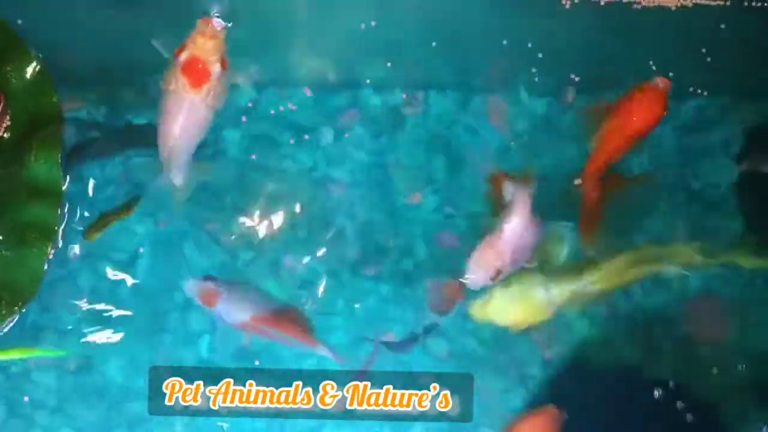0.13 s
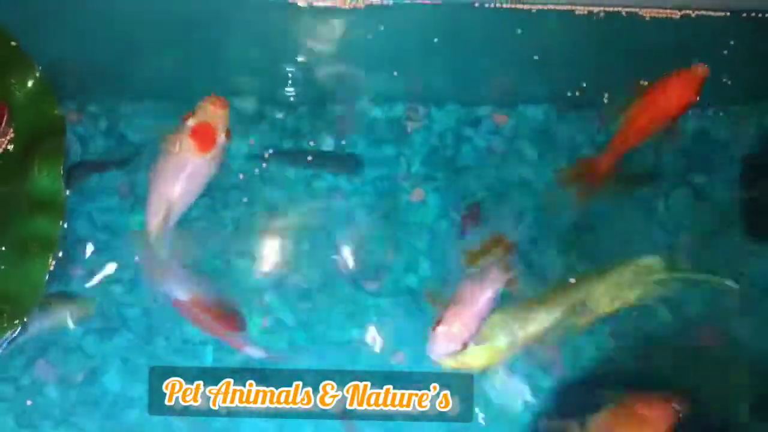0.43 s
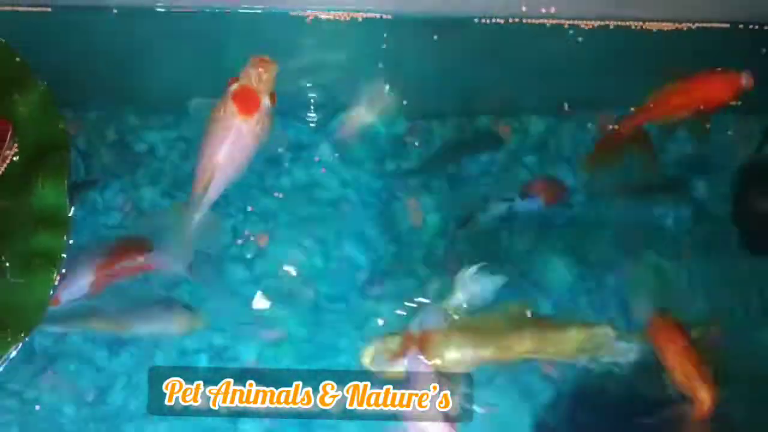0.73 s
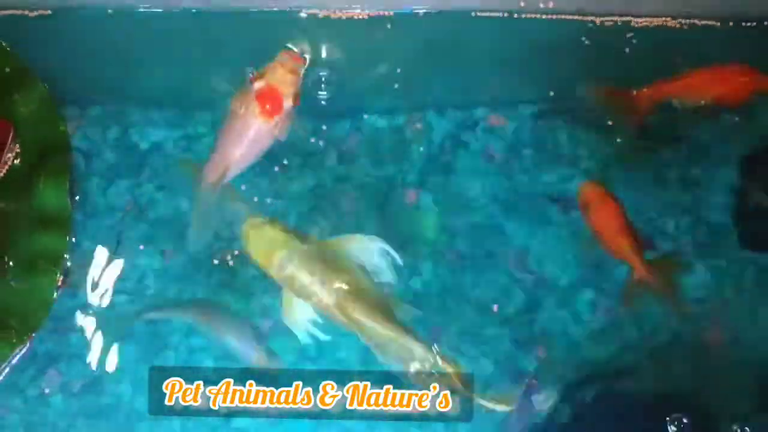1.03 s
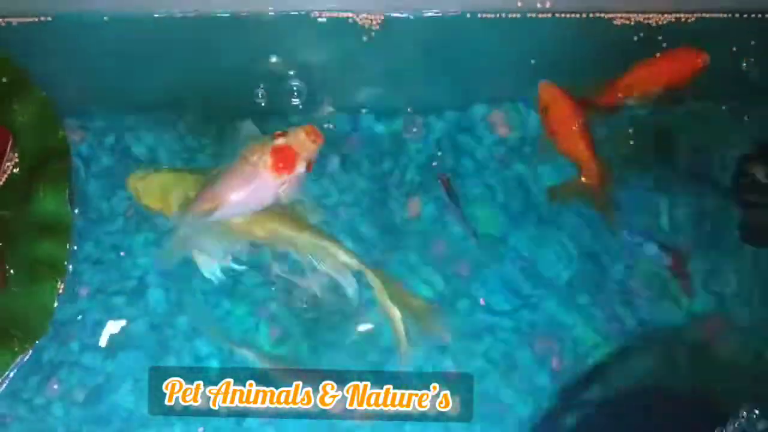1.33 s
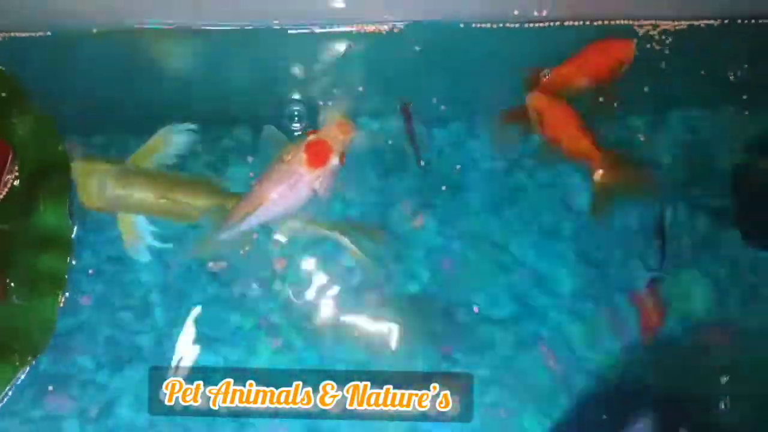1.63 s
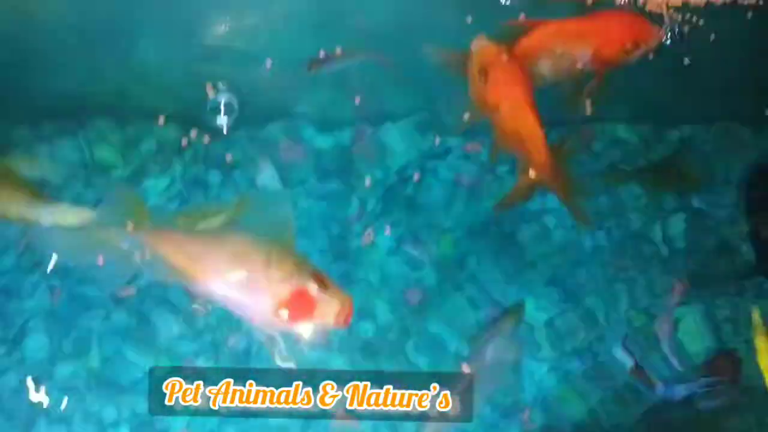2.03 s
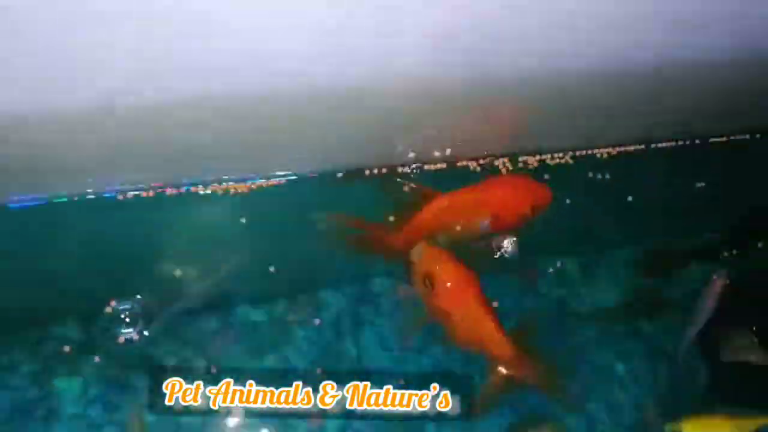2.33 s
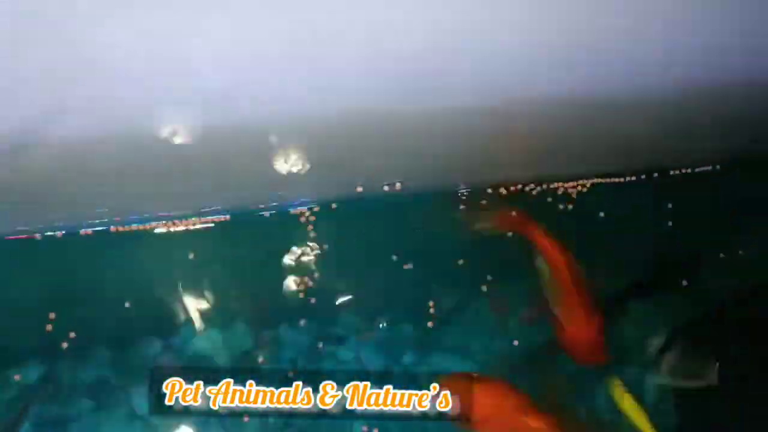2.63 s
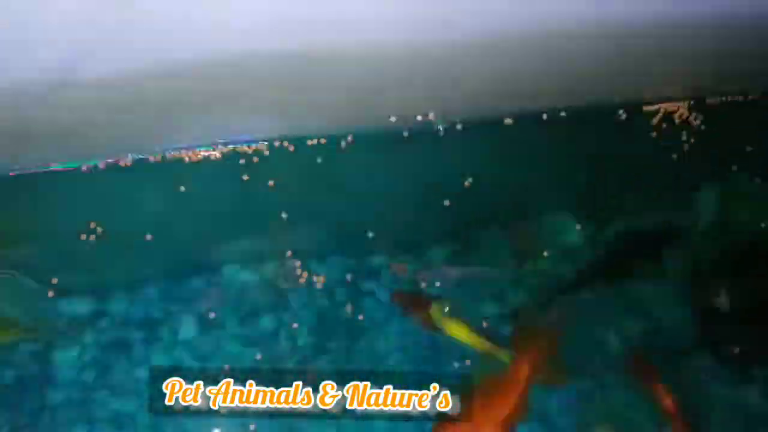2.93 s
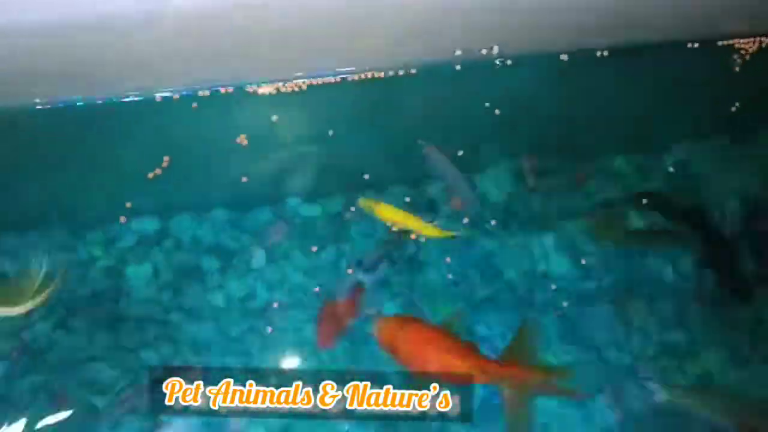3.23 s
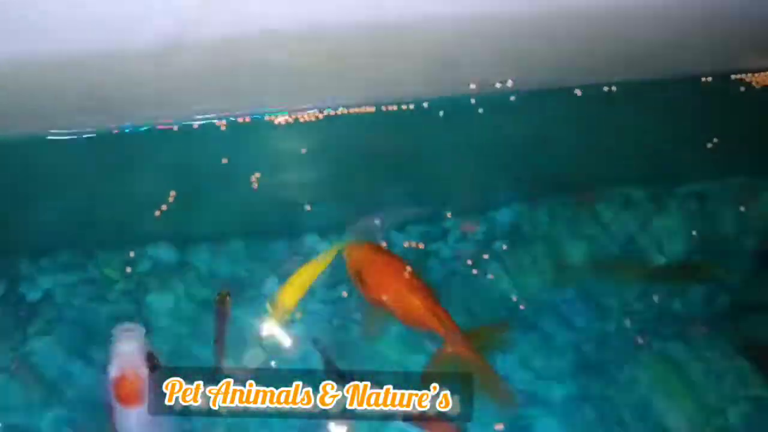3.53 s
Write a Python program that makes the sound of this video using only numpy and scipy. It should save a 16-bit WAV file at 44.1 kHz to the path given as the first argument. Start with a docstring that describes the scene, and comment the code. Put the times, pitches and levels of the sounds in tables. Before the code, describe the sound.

Bubbling water in an indoor fish tank, heard close above the surface: fizzing, popping and plopping over a steady pump buzz and low gurgle, with a small splash midway and a sharp gulping splash near the end.

```python
"""Bubbles plop, pop and fizz in an indoor fish tank, heard from just above the water. Big bubbles are ringing
tones with a very short echo from the glass walls; small ones are bursts of noise and brief tinkles.
The water is splashed twice with noisy surges, the second time sharply and with a gulp. Behind this an air pump
buzzes as a stack of harmonics, and its air stream churns and gurgles low in the tank."""
import sys
import numpy as np
from scipy import signal
from scipy.fft import rfft, irfft
from scipy.io import wavfile
from scipy.ndimage import uniform_filter1d

SR = 44100
rng = np.random.default_rng(int(sys.argv[2]) if len(sys.argv) > 2 else 0)


def log_audio(samples):
    """Write samples as a 16-bit WAV file to the path given in sys.argv[1]."""
    # one column per channel
    frames = np.atleast_2d(samples).T
    # limit to full scale, then quantise
    limited = np.clip(frames, -1, 1)
    pcm = np.round(limited * 32767).astype(np.int16)
    wavfile.write(sys.argv[1], SR, pcm)


N = 162729
T = np.arange(N) / SR
FREQS = np.arange(N // 2 + 1) * SR / N

TOP_HZ = 16050  # upper limit of the sound
BUBBLE_ATTACK_S = 0.0032  # time scale on which a bubble's ring builds up
BUBBLE_RISE_PER_S = 0.8  # share by which a bubble's pitch climbs each second
CRACKLE_FADE_S = 0.0074  # fade of the little bursts in the crackle and the splash droplets

# Loudness of the churning air stream: time_s, level_db
CHURN_LEVEL = [(0, -38.5), (1.8, -38.5), (2.1, -35), (3.69, -33.5)]
# Loudness of the fizz at the surface: time_s, level_db
FIZZ_LEVEL = [(0, -45.5), (1.0, -46.5), (1.8, -43.5), (2.05, -40), (2.3, -45.5), (2.6, -43.5), (3.1, -44),
              (3.69, -46.5)]


def undb(db):
    """Turn decibels into gain."""
    return 10 ** (np.asarray(db) / 20)


def unit(x):
    """Scale to an rms (average strength) of 1."""
    return x / np.sqrt(np.mean(x ** 2) + 1e-18)


def curve(rows):
    """Join (time_s, value) points by straight lines over the whole scene."""
    return np.interp(T, *np.array(rows).T)


def at(hz, points):
    """Read a (pitch_hz, value) curve on a log pitch axis."""
    f, value = np.array(points).T
    return np.interp(np.log(hz + 1), np.log(f), value)


def pan(db):
    """Left and right gains for a level difference; positive is louder on the left."""
    return undb(np.array([[.5], [-.5]]) * db)


def colour(x, points):
    """Filter by a (pitch_hz, level_db) curve, then scale to rms 1."""
    return unit(irfft(rfft(x) * undb(at(FREQS, points)), N))


def walk(rate):
    """Slow, smooth random drift with a spread of 1; a higher rate drifts faster."""
    k = int(SR / rate / 2)
    steps = np.repeat(rng.standard_normal(N // k + 1), k)
    return unit(uniform_filter1d(uniform_filter1d(steps, k), k)[:N])


def clicks(rate, spread_db):
    """Random clicks, mostly small and a few large, at an average rate per second."""
    happens = rng.random(N) < rate / SR
    sign = rng.choice([-1, 1], N)
    return happens * sign * undb(spread_db * np.minimum(rng.exponential(size=N), 6))


def wide_noise(size):
    """Noise that is unrelated at the two ears."""
    mid, side = rng.standard_normal((2, size))
    return unit(mid + side * np.array([[1], [-1]]))


def patter(rate, spread_db, fade):
    """Power of many overlapping little bursts, with a mean of 1."""
    t = T[:SR // 20]
    rise_s = 0.00099
    burst = (1 - np.exp(-t / rise_s)) * np.exp(-t / fade)
    power = np.abs(signal.oaconvolve(clicks(rate, spread_db) ** 2, burst ** 2)[:N])
    return power / power.mean()


def tank(x, wet_db):
    """Add the quick reflections of the glass walls as fading noise, different at each ear."""
    t = T[:SR // 5]
    t60_s = 0.02  # time for the reflections to fall by 60 dB
    tail = rng.standard_normal((2, len(t))) * np.exp(-np.log(1000) * t / t60_s)
    tail /= np.sqrt(np.sum(tail ** 2, axis=1, keepdims=True))
    return x + undb(wet_db) * signal.fftconvolve(np.atleast_2d(x), tail, axes=1)[:, :N]


def pump():
    """Each stroke thumps, then the housing buzzes; standing waves set each harmonic's level at each place."""
    # Pump harmonics: multiple, level_db at the first place, level_db at the last place,
    # left_right_db, left_lead_rad
    harmonics = [(2, -52.5, -51, -4, .1), (3, -42.5, -44.5, -2.3, 0), (4, -49, -50.5, -4, 0.23),
                 (5, -39.5, -36, -2, -0.056), (6, -43.5, -43.5, -1, 0.0025), (7, -47.5, -42.5, 7.5, 1.9),
                 (8, -50, -53, 1, 0.039), (9, -57.5, -61, 12, 0.26), (10, -55.5, -55, 1, 0.74),
                 (14, -55.5, -59, -14, -0.66), (15, -53.5, -47.5, 0, 0.33), (16, -48.5, -42.5, 1, -0.6),
                 (17, -62, -57, 0, -0.28), (18, -57, -55.5, -9, -0.34), (19, -70.5, -83, 0, 0),
                 (20, -52.5, -72, -3, -0.62), (21, -60, -75, 2, 0)]
    # The microphone drifts along the tank: time_s, share of the way (0-1)
    mic_move = [(0, 0.062), (1.75, 0.007), (2.2, 0.99), (3.69, 1)]
    stroke_hz, waver = 49.38, 0.0008  # waver is a share of the stroke rate
    rattle_above_hz, rattle_lag_s = 480, 0.00451  # the housing answers each stroke a little late
    scatter_rad, flutter_db = 0.65, 0.7
    turns = np.cumsum(stroke_hz * (1 + waver * walk(2.82))) / SR
    moved = curve(mic_move)
    out = 0
    for k, first_db, last_db, pan_db, lead in harmonics:
        lag = rattle_lag_s * (k * stroke_hz > rattle_above_hz)
        phase = 2 * np.pi * k * (turns - lag * stroke_hz) + scatter_rad * rng.standard_normal()
        db = first_db + (last_db - first_db) * moved + flutter_db * walk(8.9)
        wave = np.cos(phase + lead * np.array([[.5], [-.5]]))
        out = out + np.sqrt(2) * undb(db) * pan(pan_db) * wave  # sqrt(2) makes the level an rms level
    return out


def churn():
    """A crowd of air bubbles leaves the hose and throbs in the tank: random clicks, filtered low."""
    # Tone colour: pitch_hz, level_db per Hz
    churn_colour = [(25, -30), (70, -19), (120, -13.5), (165, 4.5), (260, -0.5), (400, -4.5), (540, -13),
                    (610, -6.5), (680, -13), (850, -10.5), (1100, -20), (1700, -28), (3000, -39)]
    # Difference between the ears: pitch_hz, share of side
    width = [(150, 0.072), (270, 0.56), (500, 0.55), (1100, 1.0)]
    mid, side = (colour(clicks(700, 1.2), churn_colour) for _ in range(2))
    side = irfft(rfft(side) * at(FREQS, width), N)
    return unit(mid + side * np.array([[1], [-1]])) * undb(curve(CHURN_LEVEL))


def gurgles():
    """Middle-sized bubbles from the air stream blip softly, each a short tone that rises a little."""
    rate_per_s, middle_hz, span_octaves = 26, 423, 1.37
    fade_s, above_churn_db = 0.009, 4
    out, t = np.zeros((2, N + SR)), T[:SR // 12]
    envelope = (1 - np.exp(-(t / BUBBLE_ATTACK_S) ** 2)) * np.exp(-t / fade_s)
    for when, size, strength, place in rng.random((int(rate_per_s * N / SR), 4)):
        hz = middle_hz * 2 ** (span_octaves * (size - .5))
        ring = np.sin(2 * np.pi * hz * (t + BUBBLE_RISE_PER_S * t ** 2 / 2))
        loudness = strength * middle_hz / hz  # low bubbles are louder
        i = int(when * N)
        out[:, i:i + len(t)] += ring * envelope * loudness * pan(10 * (place - .5))
    return out[:, :N] * undb(above_churn_db + curve(CHURN_LEVEL))


def trickle():
    """Small bubbles tinkle in the fizz, each a brief, slightly rough tone at its own pitch and place."""
    rate_per_s, middle_hz, span_octaves = 190, 5457, 3.2
    fade_s, above_fizz_db, spread_db = 0.0043, 2.52, 1.5
    roughness = 0.012  # width of a tinkle's blurred pitch, as a share of that pitch
    out, t = np.zeros((2, N + SR)), T[:SR // 25]
    envelope = (1 - np.exp(-t / BUBBLE_ATTACK_S)) * np.exp(-t / fade_s)
    for when, size, strength, place in rng.random((int(rate_per_s * N / SR), 4)):
        hz = min(middle_hz * 2 ** (span_octaves * (size - .5)), TOP_HZ)
        steps = rng.standard_normal((2, len(t)))
        wobble = np.cumsum(steps, axis=1) * np.sqrt(2 * np.pi * roughness * hz / SR)
        tone = np.sin(2 * np.pi * hz * t + wobble)
        ring = signal.lfilter(*signal.iirpeak(hz, 2, fs=SR), tone) * pan(10 * (place - .5))
        gain = undb(above_fizz_db - spread_db * np.log(strength))  # a few are much louder
        i = int(when * N)
        out[:, i:i + len(t)] += ring * envelope * gain
    return out[:, :N] * undb(curve(FIZZ_LEVEL))


def fizz():
    """Tiny bubbles burst: noise bands, each with its own uneven timing, and clusters crackle across all."""
    # Tone colour of the fizz: pitch_hz, level_db per Hz
    fizz_colour = [(600, -14), (1300, -0.5), (2000, -0.5), (3200, 2), (4500, 5.5), (6500, 0.5),
                   (9000, -5.5), (12000, -12), (16000, -8)]
    # Left-right balance of the fizz: pitch_hz, left_right_db
    fizz_balance = [(1000, -3), (2200, 0), (4500, -1), (8000, -0.5), (14000, 3)]
    # Tone colour of the finest spray: pitch_hz, level_db per Hz
    spray_colour = [(4000, -40), (7000, 0.5), (10000, -0.5), (13000, 3), (15000, 2)]
    # Loudness of the finest spray: time_s, level_db
    spray_loudness = [(0, -60.5), (.8, -50), (1.0, -56), (1.7, -53), (2.0, -40), (2.3, -43), (2.7, -42.5),
                      (3.1, -43), (3.4, -46.5), (3.69, -42)]
    # Left-right balance of the finest spray: time_s, left_right_db
    spray_balance = [(0, -13), (1.8, -9), (2.6, -0.5), (3.69, -0.5)]
    bursts_per_s, burst_spread_db, burst_fade_s = 110, 3, 0.017
    smooth = 0.14  # share of steady hiss in each band's power
    crackles_per_s, crackle_spread_db, crackle_share = 190, 1.6, 0.42
    drift_db, swell_db = 1.93, 1.0  # slow changes of each band and of the whole fizz

    edges = np.geomspace(900, TOP_HZ, 21)
    hz = np.sqrt(edges[1:] * edges[:-1])

    def band_gains(points):
        """Turn a level per Hz into one gain per band; wider bands hold more sound."""
        return unit(undb(at(hz, points)) * np.sqrt(hz)) / np.sqrt(len(hz))

    coarse, fine = band_gains(fizz_colour), band_gains(spray_colour)
    fizz_gain = undb(curve(FIZZ_LEVEL))
    spray_gain = undb(curve(spray_loudness)) * pan(curve(spray_balance))
    out = 0
    for k, f in enumerate(hz):
        band_filter = signal.butter(2, edges[k:k + 2], "band", fs=SR, output="sos")
        band = unit(signal.sosfilt(band_filter, wide_noise(size=N)))
        power = smooth + (1 - smooth) * patter(bursts_per_s, burst_spread_db, burst_fade_s)
        bursts = np.sqrt(power) * undb(drift_db * walk(12))
        level = np.hypot(coarse[k] * fizz_gain, fine[k] * spray_gain)
        out = out + band * bursts * level * pan(at(f, fizz_balance))
    clusters = patter(crackles_per_s, crackle_spread_db, CRACKLE_FADE_S)
    crackle = np.sqrt(1 - crackle_share + crackle_share * clusters)
    return out * crackle * undb(swell_db * walk(10))


def pops():
    """A film tears with a crack of noise and the small cavity under it rings briefly."""
    # Bursting bubbles: start_s, level_db (before trim_db), pitch_hz, left_right_db, fade_s
    bursting = [(.050, -33.5, 11600, -1, 0.0037), (0.066, -29.5, 4800, -7, 0.0054),
                (0.149, -32.5, 9900, -1, 0.0086), (.203, -35, 5570, 1, .006),
                (0.263, -30.5, 9050, -3, 0.011), (0.265, -34, 5000, -3, 0.0081),
                (0.407, -38.5, 5700, -1, .009), (.538, -26, 10500, -4, 0.01), (.585, -35, 10500, -5, .008),
                (0.746, -32, 7040, -2, 0.011), (.781, -29.5, 10300, -11, 0.0064),
                (.803, -42, 14300, -5, 0.0073), (1.083, -37.5, 11300, -8, 0.017),
                (1.108, -23, 8330, -8.5, 0.0015), (1.15, -30.5, 6400, 0, 0.0099),
                (1.358, -20, 5880, -2, 0.005), (1.449, -38, 13400, -12, 0.0068),
                (1.478, -30.5, 10000, -4, .004), (1.66, -34.5, 13000, -4, 0.0036),
                (1.821, -30, 14000, -1, 0.0056), (1.849, -32, 8000, -8, .005),
                (2.348, -34.5, 11000, -1, 0.01), (2.457, -29.5, 9000, -3, .004),
                (2.507, -28, 9400, -4, 0.013), (2.538, -32, 14000, -2, .008),
                (2.603, -26.5, 4240, -4, 0.011), (2.648, -31, 14200, 0, .008),
                (2.73, -22, 13900, -2, 0.0039), (2.768, -28, 12100, -2, 0.0036),
                (2.786, -22.5, 12400, -6, 0.002), (2.83, -23.5, 4300, -1, 0.0076),
                (2.862, -30, 14000, -2, .009), (2.898, -22.5, 13300, -1, 0.0057),
                (2.944, -24.5, 11100, 0, 0.0065), (3.01, -34, 13300, -2, 0.02),
                (3.05, -26, 15000, 2, 0.0055), (3.094, -22, 10900, -1, 0.01), (3.12, -30, 13900, 5, 0.0098),
                (3.169, -28, 14200, 3, .005), (3.213, -31, 6560, 0, 0.01), (3.347, -28.5, 13400, 3, 0.0057),
                (3.368, -29.5, 12600, 1, 0.0099), (3.42, -32.5, 8950, 0, .007),
                (3.494, -23.5, 5770, -3, 0.0098), (3.495, -21.5, 7540, 1, 0.0065)]
    trim_db, rise_s = -3, 0.0033
    ring_width = 0.28  # width of the resonance as a share of its pitch, before it is applied twice
    crack_db, crack_from = -12.5, 0.68  # level against the ring; lower edge as a share of the pitch
    out, t = np.zeros((2, N)), T[:SR // 15]
    for start, db, hz, pan_db, fade in bursting:
        tear = wide_noise(size=len(t))
        cavity = signal.iirpeak(min(hz, .4 * SR), 1 / ring_width, fs=SR)
        ring = unit(signal.lfilter(*cavity, signal.lfilter(*cavity, tear)))
        crack_filter = signal.butter(2, min(hz * crack_from, TOP_HZ), "high", fs=SR, output="sos")
        crack = unit(signal.sosfilt(crack_filter, tear))
        envelope = np.minimum(t / rise_s, np.exp(-(t - rise_s) / fade))
        pop = (ring + undb(crack_db) * crack) * envelope * undb(db + trim_db) * pan(pan_db)
        i = int(start * SR)
        out[:, i:i + len(t)] += pop[:, :N - i]
    return out


def splashes():
    """Each splash comes in two surges of noise: a sheet of droplets flies up, then water slaps back."""
    # Surges, two for each splash: start_s, rise_s, hold_s, fade_s, level_db, slap against droplets in dB
    surges = [(2.04, 0.028, 0.015, 0.0081, -33.5, -20), (2.068, .008, .015, 0.0075, -33, 1),
              (3.522, 0.034, 0.026, 0.023, -18.5, -22.5), (3.591, 0.014, 0.013, .007, -29, -8)]
    # Tone colour of the droplets: pitch_hz, level_db per Hz
    droplet_colour = [(300, -32), (700, -8), (1300, -9), (2200, -13), (3400, -3.5), (5000, 5), (7000, 2.5),
                      (9500, 2.5), (12000, -3), (15500, 2.5)]
    # Left-right balance of the droplets: pitch_hz, left_right_db
    droplet_balance = [(1000, -9), (4500, -9.5), (8000, -2), (13000, 6.5)]
    # Tone colour of the slap of the water: pitch_hz, level_db per Hz
    slap_colour = [(500, -26), (1000, 5.5), (1500, -1), (3000, 5), (4500, -13), (8000, -15)]
    drops_per_s, drop_spread_db = 1980, 1
    balanced = irfft(rfft(wide_noise(size=N)) * pan(at(FREQS, droplet_balance)), N)
    sheet = colour(balanced, droplet_colour)
    slap = colour(wide_noise(size=N), slap_colour)
    out = 0
    for start, rise, hold, fade, db, slap_db in surges:
        swell = np.clip((T - start) / rise, 0, 1)
        envelope = swell * np.exp(-np.maximum(T - start - rise - hold, 0) / fade)
        out = out + undb(db) * envelope * (sheet + undb(slap_db) * slap)
    return out * np.sqrt(patter(drops_per_s, drop_spread_db, CRACKLE_FADE_S))


def plops():
    """Large bubbles ring and rise a little in pitch; those that break up at the surface mostly spatter."""
    # Large bubbles: start_s, pitch_hz, level_db, fade_s, left_right_db, share of spatter (0-1)
    large_bubbles = [(.133, 640, -29, 0.01, -6, 0.75), (.137, 1440, -37.5, 0.011, -2, 0.8),
                     (.345, 1940, -30, 0.0047, -4, .1), (.618, 1810, -42, .008, 0, .5),
                     (.983, 1800, -34, 0.011, 0, 0.56), (1.139, 1450, -39.5, 0.01, 0, 0.5),
                     (1.141, 594, -30, 0.015, -3, .6), (1.152, 780, -25.5, 0.0071, -1, .3),
                     (1.197, 1440, -38, 0.0079, 0, 0.3), (1.310, 517, -39.5, 0.017, 0, .5),
                     (1.444, 815, -16.5, .0105, -4, .04), (1.454, 910, -23, .005, 0, .1),
                     (2.095, 600, -27.5, 0.021, -9, .1), (2.141, 1100, -27, .0025, -7, .9),
                     (2.263, 595, -32.5, .01, -13, 0.5), (2.463, 1350, -28, 0.0068, 0, .4),
                     (2.464, 605, -33, .006, -10, 0.8), (2.583, 468, -24.5, 0.019, -3, .35),
                     (2.586, 586, -25, 0.0093, 2, .4), (2.587, 1000, -36, 0.015, -4, 0.65),
                     (2.615, 1430, -41, 0.021, -2, 0.4), (2.731, 1275, -36, .012, 5, .5),
                     (2.733, 2230, -35.5, 0.013, -5, .6), (3.585, 860, -29, .005, 0, .3),
                     (3.591, 424, -7.5, .0072, 7, 0), (3.605, 636, -26, 0.014, -12, 0.3),
                     (3.616, 816, -30, 0.0082, -2, 0.9)]
    # Tone colour of the spatter: multiple of the bubble's pitch, level_db per Hz
    spatter_colour = [(.15, -40), (.4, -22), (.8, -5), (1, 7.5), (1.3, -6), (2.2, -14), (5, -25), (12, -45)]
    out, t = np.zeros((2, N + SR)), T[:SR // 6]
    for start, hz, db, fade, pan_db, broken in large_bubbles:
        ring = np.sin(2 * np.pi * hz * (t + BUBBLE_RISE_PER_S * t ** 2 / 2))
        points = [(k * hz, level_db) for k, level_db in spatter_colour]
        shape = undb(at(np.fft.rfftfreq(len(t), 1 / SR), points))
        spatter = unit(irfft(rfft(wide_noise(size=len(t))) * shape, len(t)))
        envelope = (1 - np.exp(-(t / BUBBLE_ATTACK_S) ** 2)) * np.exp(-t / fade)
        plop = np.sqrt(1 - broken) * ring + np.sqrt(broken) * spatter
        i = int(start * SR)
        out[:, i:i + len(t)] += undb(db) * pan(pan_db) * envelope * plop
    return tank(out[:, :N], wet_db=-11)


def scene():
    """Pump and water together."""
    air_stream = pump() + churn() + gurgles()
    surface = trickle() + fizz() + pops()
    return air_stream + surface + splashes() + plops()


def record(dry):
    """A steep filter cuts the top of the sound."""
    return signal.sosfilt(signal.ellip(10, .2, 80, TOP_HZ, fs=SR, output="sos"), dry)


dry = scene()
out = record(dry)
log_audio(out)
```